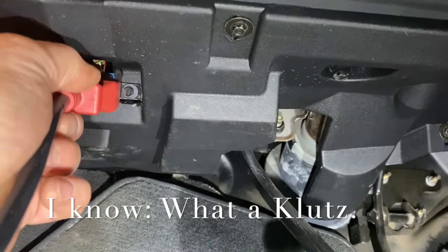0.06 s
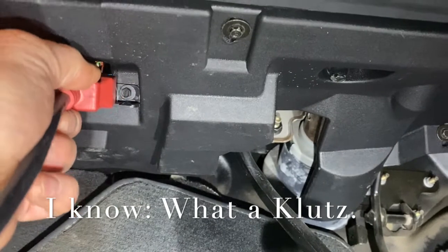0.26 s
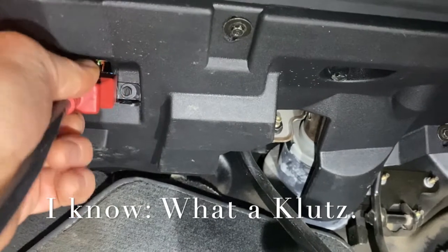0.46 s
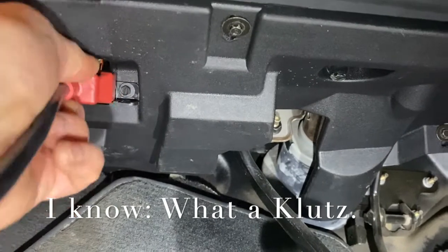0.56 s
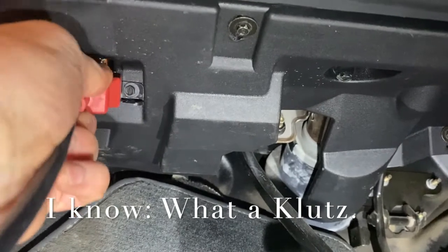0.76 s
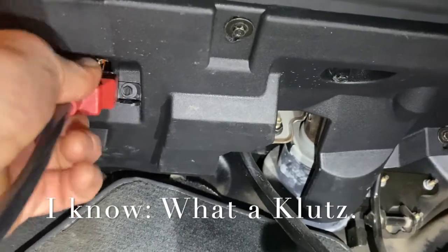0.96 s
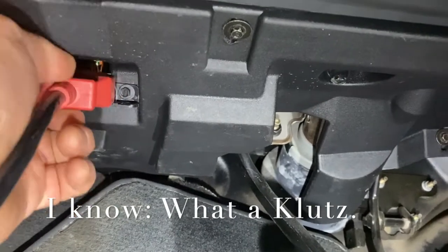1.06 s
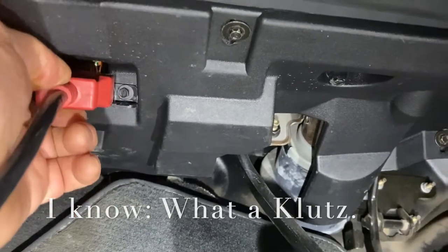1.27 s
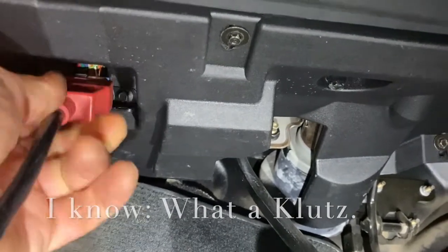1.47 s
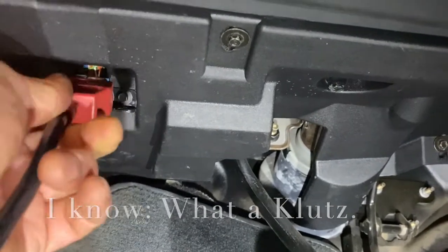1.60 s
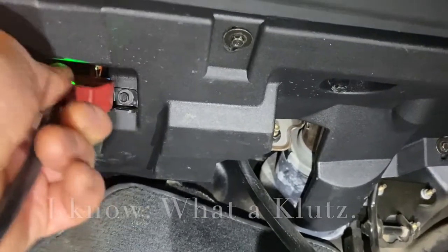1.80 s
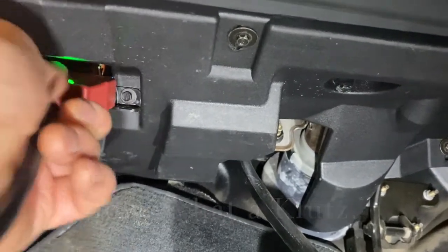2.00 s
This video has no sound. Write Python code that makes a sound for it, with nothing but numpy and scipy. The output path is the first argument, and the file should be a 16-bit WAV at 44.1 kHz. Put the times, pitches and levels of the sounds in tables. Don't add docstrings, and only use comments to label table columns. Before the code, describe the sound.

Plastic plug clicking and snapping as fingers work it into a socket, over low cabin hum

```python
import sys
import numpy as np
from scipy import signal
from scipy.fft import rfft, irfft, next_fast_len
from scipy.io import wavfile
from scipy.ndimage import uniform_filter1d, map_coordinates

SR = 44100
rng = np.random.default_rng(int(sys.argv[2]) if len(sys.argv) > 2 else 0)


def amplitude_ratio(level_db):
    exponent = np.asarray(level_db, float) / 20
    return 10 ** exponent


def master(y):
    cut = np.clip(np.atleast_2d(y).T, -1, 1)
    pcm = np.round(cut * 32767)
    wavfile.write(sys.argv[1], SR, pcm.astype(np.int16))


N = 90052


def unit(x):
    return x / np.sqrt(np.mean(x ** 2) + 1e-20)


def along(points, hz):
    f, v = np.transpose(points)
    return np.interp(np.log(hz + 1), np.log(f + 1), v)


def curve(rows):
    return np.interp(np.arange(N) / SR, *np.transpose(rows))


def wobble(rate):
    knots = rng.standard_normal(int(N * rate / SR) + 4)
    return map_coordinates(knots, [np.arange(N) * rate / SR])


def filtered(x, response):
    m = next_fast_len(N + 8192)
    return irfft(rfft(x, m) * response(np.fft.rfftfreq(m, 1 / SR)), m)[..., :N]


def patchy(x, depth_db):
    z = signal.stft(x, nperseg=256)[2]
    field = uniform_filter1d(rng.standard_normal(z.shape), size=4, axis=0)
    field = uniform_filter1d(field, size=6, axis=1)
    gain = amplitude_ratio(depth_db * unit(field) - depth_db ** 2 / 9)
    return signal.istft(z * gain, nperseg=256)[1][:N]


# (frequency [Hz], density [dB per Hz])
RUMBLE = [(20, -45), (40, -6), (75, -4), (114, 3), (190, -10), (250, -6), (340, -22.5), (1500, -45.5)]
# (frequency [Hz], width [Hz], level [dB])
CABIN_MODES = [(67.7, 17, 10), (95, 25, 3), (235.4, 8.9, 5)]
# (time [s], level [dB])
HUM_LEVEL = [
    (0, -38),
    (.4, -42.5),
    (1.2, -43.5),
    (1.55, -40),
    (1.8, -41),
    (2.04, -41),
]


def hum():
    def shape(f):
        boom = sum(amplitude_ratio(db) / (1 + ((f - c) / w) ** 2) for c, w, db in CABIN_MODES)
        rumble = amplitude_ratio(along(RUMBLE, f)) / (1 + (f / RUMBLE[-1][0]) ** 4)
        return rumble * (1 + 0.52 * boom)

    rumble = unit(filtered(rng.standard_normal(N), shape))
    return amplitude_ratio(curve(HUM_LEVEL) + 2.5 + 0.35 * wobble(4.0)) * rumble


# (frequency [Hz], density [dB per Hz])
CLOTH = [(300, 18), (700, 0), (1500, 0.5), (3600, -2.5), (5000, 0.5), (9500, -9), (15500, -17.5),
         (16200, -36)]
# (time [s], level [dB])
SLEEVE_LEVEL = [(0, -50.5), (.08, -68), (.26, -71.5), (.32, -74.5), (.5, -71), (.6, -74.5), (.66, -68.5),
                (.78, -71.5), (.85, -77.5), (.95, -73), (1.17, -70.5), (1.28, -80), (1.4, -64.5),
                (1.5, -73), (1.66, -65), (1.76, -74.5), (1.85, -66.5), (1.93, -77)]


def sleeve():
    hiss = unit(filtered(rng.standard_normal(N), lambda f: amplitude_ratio(along(CLOTH, f)) * (f > 250)))
    return amplitude_ratio(curve(SLEEVE_LEVEL) + 4.5 + 1.06 * wobble(27.32)) * patchy(hiss, depth_db=2.5)


def body(modes):
    def raw(f):
        total = 0
        for k, (center, width, db) in enumerate(modes):
            damping = 1j * f * width
            total = total + (-1) ** k * amplitude_ratio(db) * damping / (center * center - f * f + damping)
        return total

    return lambda f: raw(f) / np.sqrt(np.mean(abs(raw(f)) ** 2)) / (1 + 1j * f / 6840) ** 2


# (frequency [Hz], width [Hz], level [dB])
PANEL_MODES = [(476, 48, -2), (626, 45.3, 3), (758, 313, -5), (955, 303, -0.5), (1277, 326, -1),
               (1415, 294, -3.5), (1963, 380, -14.5)]
# (frequency [Hz], width [Hz], level [dB])
SHELL_MODES = [(2238, 230, 1), (2703, 280, 0.5), (3044, 152, 3), (3460, 334, 2.5)]
# (frequency [Hz], width [Hz], level [dB])
LATCH_MODES = [(4150, 227, 2.5), (4750, 990, 1.5), (5320, 1300, 1.5)]
# (frequency [Hz], density [dB per Hz])
PIN_SHEEN = [(5200, -16.5), (6500, 3.5), (8900, 5), (10500, 0.5), (12200, 2), (15600, -1.5), (16500, -10.5)]


def parts(env, kick=0):
    def sheen(f):
        return unit(amplitude_ratio(along(PIN_SHEEN, f)) * (f > PIN_SHEEN[0][0]))

    push = env * rng.standard_normal((4, N)) + kick
    responses = body(PANEL_MODES), body(SHELL_MODES), body(LATCH_MODES), sheen
    return sum(filtered(x, response) for x, response in zip(push, responses))


# (time [s], length [s], level [dB], dull part [dB], bright part [dB])
STROKES = [(0, 0.022, -48, -2, -4), (0.123, .07, -58, 8, -3), (0.197, 0.095, -62.5, 5.5, -13),
           (0.326, 0.14, -69, 4.5, -24), (0.472, 0.08, -59, -0.5, -2.5), (0.553, 0.08, -70, 10.5, -10),
           (0.675, 0.11, -55, 3.5, -9), (0.902, 0.095, -69, 4, -7), (1.021, 0.1, -68, 5, -1.5),
           (1.158, 0.034, -60.5, 3, 4.5), (1.346, 0.023, -56, 5.5, -9), (1.367, 0.12, -76, 11, -2),
           (1.625, 0.13, -75, 10, -2), (1.776, 0.065, -69.5, 4.5, 3), (1.824, 0.068, -59.5, 3, -11.5),
           (1.954, 0.1, -75.5, 7.5, 6)]
# (time [s], length [s], level [dB])
BRUSHES = [
    (1.375, 0.052, -63.5),
    (0.92, .1, -77),
    (1.82, 0.04, -71.5),
    (1.075, .02, -67.5),
    (.2, 0.049, -74),
    (.5, 0.075, -73),
]


def scuffs():
    t = np.arange(N) / SR
    edge = 0.027
    env = np.zeros((4, N))
    for s, length, db, dull_db, bright_db in STROKES:
        rise, fall = 2 * (t - s) + edge, s + length - t + edge
        part_db = np.array([[dull_db], [0], [bright_db], [bright_db - 20]])
        env += amplitude_ratio(db + part_db) * np.clip(np.minimum(rise, fall) / edge / 2, 0, 1) ** 2
    for s, length, db in BRUSHES:
        env[3] += amplitude_ratio(db) * np.clip(np.minimum(t - s, s + length - t) / edge + 1, 0, 1) ** 2
    slips_per_s, slip_size = 330, 1.4
    caught = rng.random(N) < slips_per_s / SR
    slips = slip_size * caught * rng.exponential(size=(4, N))
    grain_db = 2.5 * np.array([wobble(200) for _ in env]) + 2.94 * wobble(60.78)
    return patchy(parts(env * amplitude_ratio(grain_db), env * slips), depth_db=3.0)


# (time [s], peak level [dB],
# panel over shell [dB], latch over shell [dB], pins over shell [dB])
PLUG_SNAPS = [(.0408, -38, 6, 4, -40), (.1635, -35.5, 1.5, 3.5, -20), (.1805, -27, -18, -8, -14),
              (.372, -44.5, -7.5, 2, 3.5), (.477, -55.5, -2.5, 7.5, 1), (.544, -58, 13, -11, -25),
              (.583, -52.5, 5, -8, -14), (.6868, -34.5, -12, 3.5, -6), (.6898, -39.5, -5.5, 5, -1.5),
              (.7228, -41, -6, 3, 12.5), (.745, -43, 2, 0, -21.5), (.7528, -33, -0.5, -2, -5),
              (.7645, -41.5, 6.5, 0.5, -3), (1.0375, -52, -10, 2.5, 1.5), (1.358, -50, -4, -2.5, -29),
              (1.466, -48.5, -9, -1, 7.5), (1.5394, -45, -11.5, -3.5, 7), (1.794, -50.5, 0.5, -13, -12),
              (1.842, -50, -5, -4, -3), (1.972, -63, -6, 14.5, 8), (2.0385, -42, -4.5, 1, -2)]
# (time [s], peak level [dB], panel over shell [dB], pins over shell [dB])
FAINT_TICKS = [(0.1117, -49, 4.5, -33), (0.142, -37.5, -17, -40), (0.3341, -68, 18.5, -38.5),
               (0.3584, -46.5, -4, -11), (0.4267, -48, -11, 1), (0.5149, -63, -4, -20),
               (0.645, -53.5, 5, -11), (0.6567, -54, -11, -16), (0.8043, -50.5, 7.5, -39),
               (0.8926, -59.5, 7, -28), (0.9667, -51, -10, -20), (1.078, -62.5, 11.5, -24.5),
               (1.4208, -61.5, 7, 13.5), (1.5, -46.5, -5, -4), (1.6272, -49.5, -4, -1),
               (1.7129, -47.5, -1, -4.5), (1.875, -49.5, -13, -3), (1.856, -51, -7, -6),
               (1.963, -50.5, 0.5, -30), (2.001, -50.5, -7, 3.5)]
FIRST_BLOW = [
    [11.7],
    [7.6],
    [8],
    [4.2],
]


def clicks():
    env, kick = np.zeros((4, N + SR)), np.zeros((4, N))
    t = np.arange(SR // 4) / SR
    t60 = 0.032 * np.array([[2.17], [1], [.9], [0.78]])
    rattle = amplitude_ratio(-60 * t / t60) * (1 - np.exp(-t / 0.00038))
    ticks = [(s, db - 6.5, panel + 3, -1.5, pins + 3) for s, db, panel, pins in FAINT_TICKS]
    for s, db, panel_db, latch_db, pins_db in list(PLUG_SNAPS) + ticks:
        size = amplitude_ratio(db - 5 + np.array([[panel_db], [0], [latch_db], [pins_db]]))
        start = round(s * SR)
        env[:, start:][:, :len(t)] += size * rattle
        kick[:, start:][:, :1] += size * np.array(FIRST_BLOW)
    return parts(env[:, :N], kick)


# (time [s], frequency [Hz], peak level [dB], 60 dB decay [s])
CLEAR_MODES = [(.0412, 504, -28.5, 0.03), (0.0411, 1382, -37, 0.049), (0.0422, 3464, -33.5, 0.018),
               (.0412, 5200, -51, 0.018), (0.1648, 940, -32.5, 0.037), (.1637, 3530, -40, 0.028),
               (.1805, 1086, -33.5, 0.038), (.1805, 3317, -27, 0.017), (0.1815, 2420, -40, 0.047),
               (.478, 4900, -45, 0.032), (.486, 2400, -50.5, 0.035), (.499, 2270, -54, .02),
               (.512, 2320, -52.5, 0.034), (.516, 3520, -51, 0.022), (.52, 4400, -46, 0.027),
               (0.5452, 960, -43, .025), (.583, 1080, -72, 0.026), (.583, 2150, -54, 0.018),
               (0.6865, 3054, -31.5, 0.022), (.6868, 1956, -32.5, 0.027), (0.6885, 4574, -30.5, 0.031),
               (0.6941, 3050, -36.5, 0.027), (.7228, 2384, -35.5, 0.043), (0.7248, 3880, -35, 0.021),
               (.7522, 665, -30.5, .05), (.7525, 800, -39.5, .04), (0.7531, 1003, -28.5, 0.033),
               (0.7553, 1561, -27.5, 0.029), (.758, 1800, -32.5, 0.029), (.76, 547, -35.5, 0.073),
               (0.761, 1002, -35, 0.037), (1.044, 1080, -52, 0.017), (1.043, 3140, -55, 0.035),
               (1.172, 5100, -47, .025), (1.36, 3350, -50, 0.016), (1.466, 3150, -54, 0.014),
               (1.503, 609, -45, 0.069), (1.44, 498, -48, 0.18), (1.39, 636, -52, 0.14),
               (1.5386, 3010, -47.5, 0.023), (1.5392, 5240, -45.5, 0.016), (1.629, 626, -54.5, 0.1),
               (1.841, 960, -47.5, 0.053), (1.964, 607, -49.5, 0.15)]


def rings():
    out, t = np.zeros(N + SR), np.arange(SR // 8) / SR
    rise = 1 - np.exp(-t / 0.00027)
    for s, hz, db, t60 in CLEAR_MODES:
        out[round(s * SR):][:len(t)] += amplitude_ratio(db - 60 * t / t60) * rise * np.sin(2 * np.pi * hz * t)
    return out[:N]


# (time [s], peak level [dB], pitch [Hz])
PANEL_KNOCKS = [(0.05, -32.5, 223.4), (0.119, -43, 249), (0.14, -28.5, 197.5), (0.168, -23, 211.5),
                (0.182, -28.5, 237), (0.341, -38, 246.6), (0.757, -34, 197.5), (0.94, -47, 162),
                (1.096, -37.5, 151.2), (1.29, -36.5, 134), (1.347, -37.5, 129.5), (1.438, -35, 253),
                (1.503, -28, 212.4), (1.547, -36.5, 140.4), (1.689, -38.5, 208), (1.859, -38, 222)]


def thuds():
    out, t = np.zeros(N + SR), np.arange(SR // 4) / SR
    t60, rise_s = 0.086, 0.0038
    for s, db, hz in PANEL_KNOCKS:
        turn = 2 * np.pi * hz * t
        ring = np.sin(turn) + amplitude_ratio(-6.5) * np.sin(0.445 * turn) + amplitude_ratio(-12.5) * np.sin(1.316 * turn)
        out[round(s * SR):][:len(t)] += amplitude_ratio(db + 8.5 - 60 * t / t60) * (1 - np.exp(-t / rise_s)) * ring
    return out[:N]


def cabin(x):
    t = np.arange(SR // 5) / SR
    t60 = .08
    tail = rng.standard_normal((2, len(t))) * amplitude_ratio(-60 * t / t60)
    return signal.fftconvolve(x[None], tail / np.linalg.norm(tail[0]), axes=1)[:, :N]


# (frequency [Hz], lead [rad])
PORT_LEAD = [(100, 0), (900, -.4), (3000, 1.2), (5700, 1.2), (7450, 3.14), (10500, 6.28), (13700, 9.42),
             (15400, 12.4)]
# (frequency [Hz], level [dB])
PORT_DIFFERENCE = [(40, -68), (300, -5), (700, -4), (1200, -8), (3000, -6), (5600, -9.5), (6600, -9.5)]


def scene():
    near = clicks() + scuffs() + rings()
    steady = thuds() + hum() + sleeve()
    apart = cabin(near + steady)[1]
    whole = near + steady + amplitude_ratio(-18) * cabin(near)[0]
    loose = filtered(apart, lambda f: amplitude_ratio(along(PORT_DIFFERENCE, f)))

    def port_phase(f):
        lead = along(PORT_LEAD, f)
        lead = lead - .5 * np.sin(2 * lead)
        return np.exp(.5j * np.outer([1, -1], lead))

    return filtered(np.array([whole + loose, whole - loose]), port_phase)


def joint(x):
    both = np.array([x[0] + x[1], x[0] - x[1]]) / 2
    z = signal.stft(both, nperseg=2048, noverlap=1536)[2]
    power = (abs(z[:, :1024]) ** 2).reshape(2, 64, 16, -1).mean(2)
    power = uniform_filter1d(power, size=3, axis=2)
    power = abs(uniform_filter1d(power, size=3, axis=1))
    weaker_db, quiet_db = -6.5, -92
    weak = (power < power[::-1] * amplitude_ratio(2 * weaker_db)) & (power < amplitude_ratio(2 * quiet_db))
    weak[:, :16] = False
    z[:, :1024] *= ~np.repeat(weak, 16, axis=1)
    mid, side = signal.istft(z, nperseg=2048, noverlap=1536)[1][:, :N]
    return np.array([mid + side, mid - side])


def band_limit(x):
    return signal.sosfilt(signal.butter(12, 16680, fs=SR, output="sos"), x)


def record(dry):
    def treble_limit(hz):
        return (hz < 16600) * amplitude_ratio(-30 * np.clip((hz - 15850) / 300, 0, 1))

    mix = joint(filtered(dry, treble_limit))
    return band_limit(mix)


dry = scene()
out = record(dry)
master(out)
```